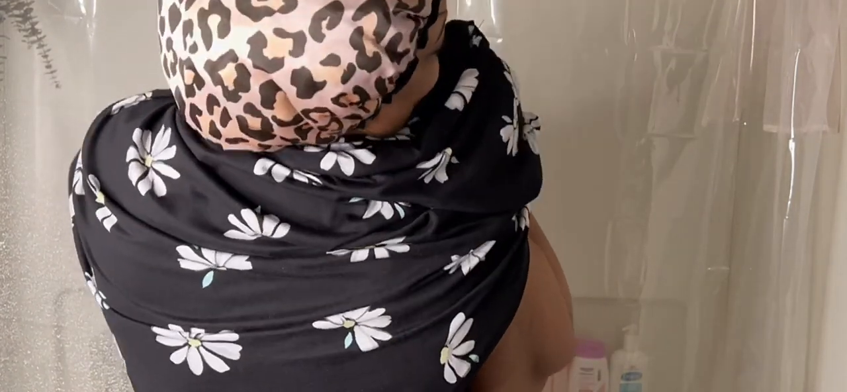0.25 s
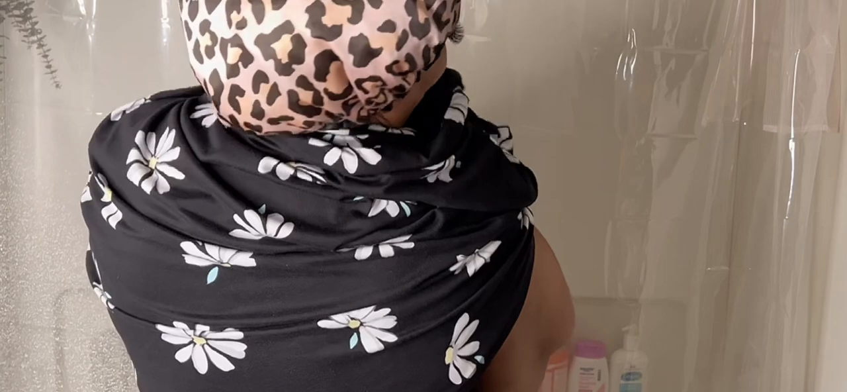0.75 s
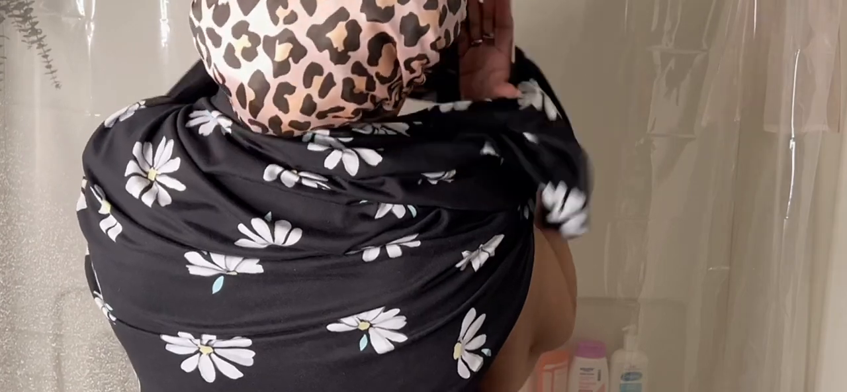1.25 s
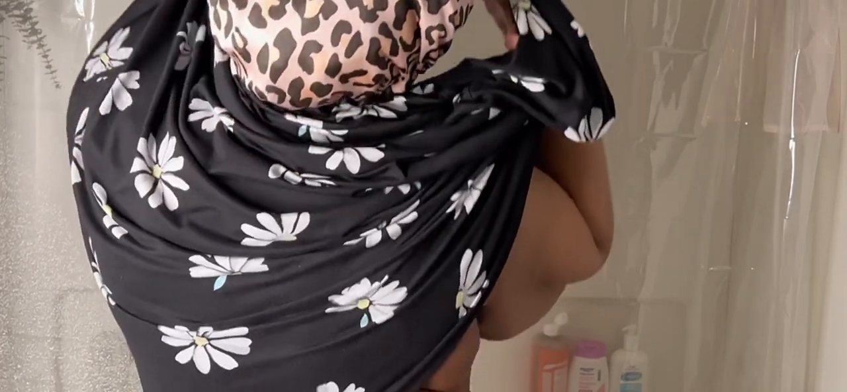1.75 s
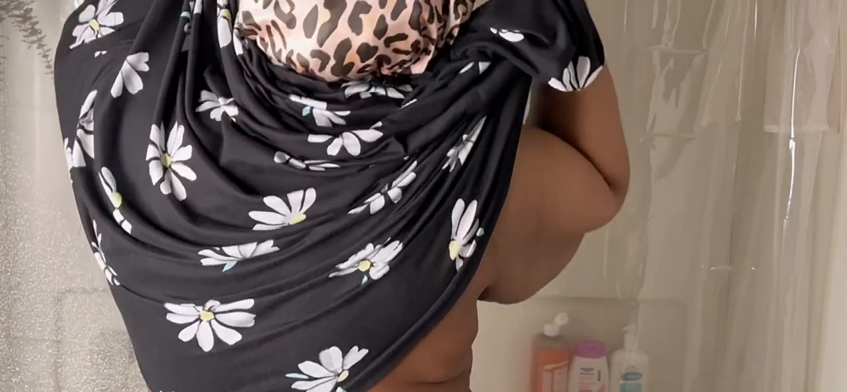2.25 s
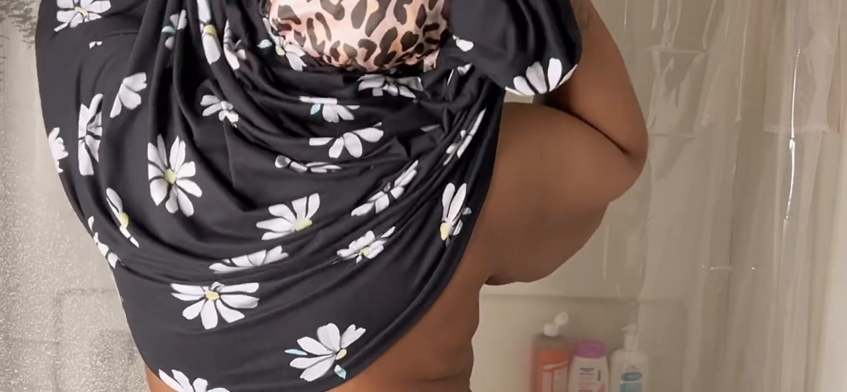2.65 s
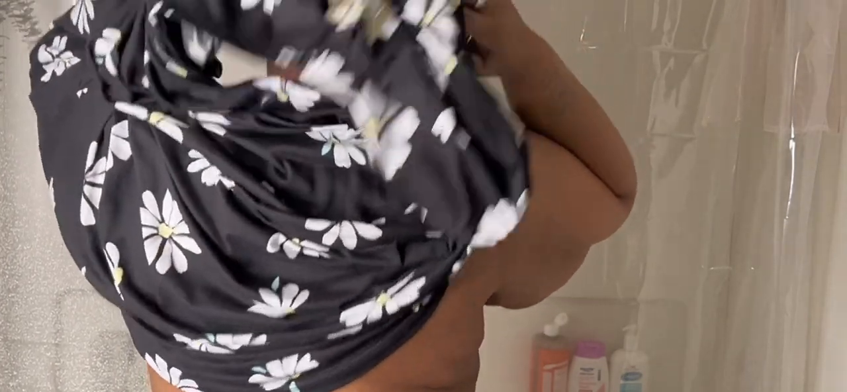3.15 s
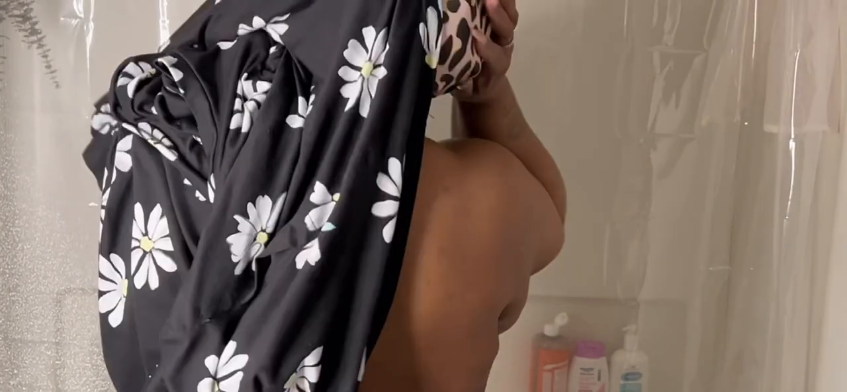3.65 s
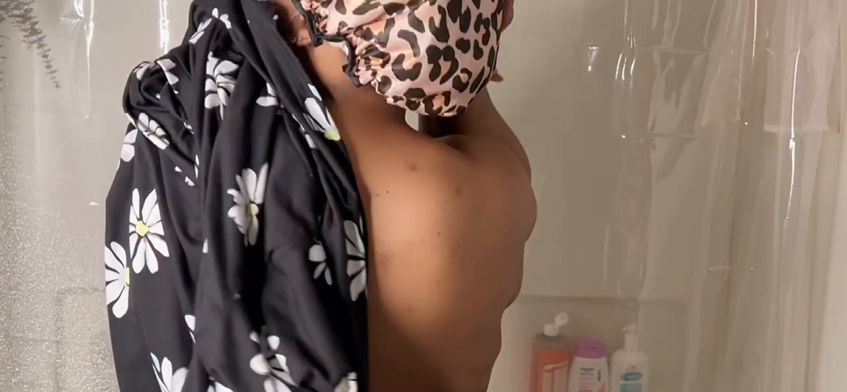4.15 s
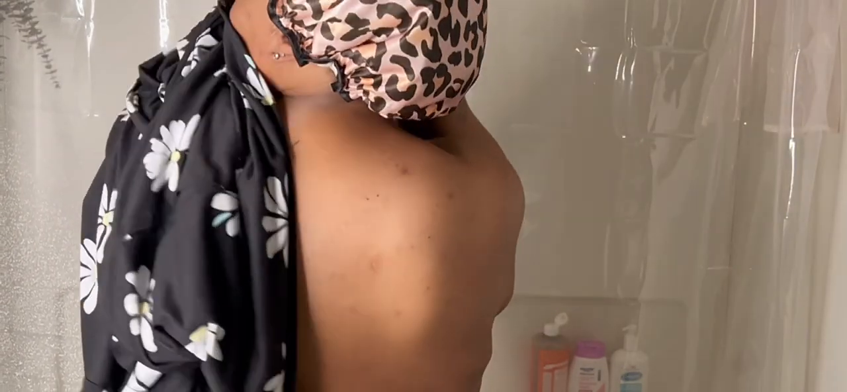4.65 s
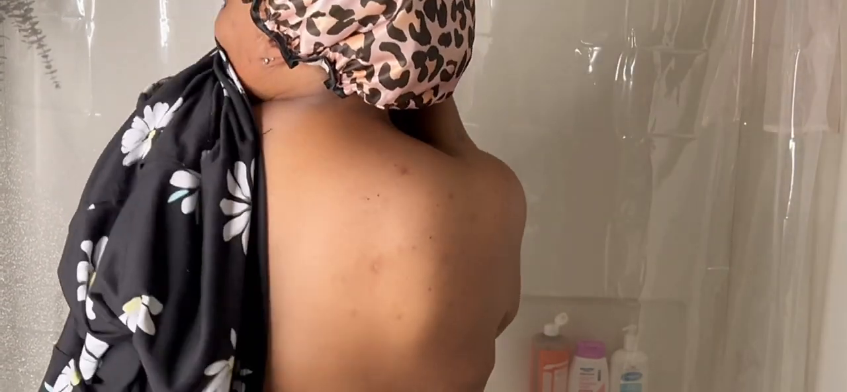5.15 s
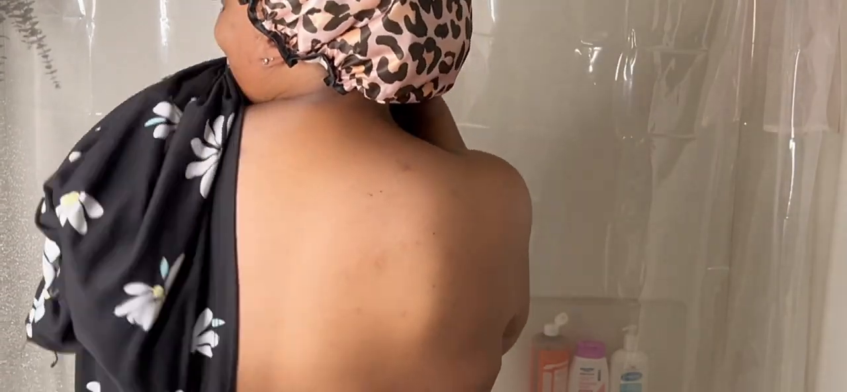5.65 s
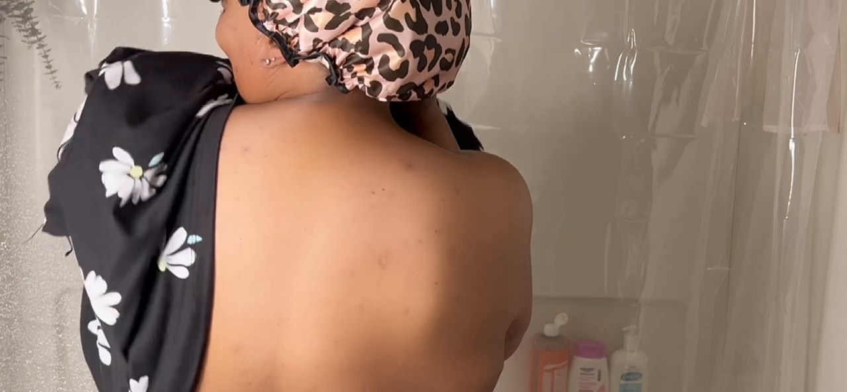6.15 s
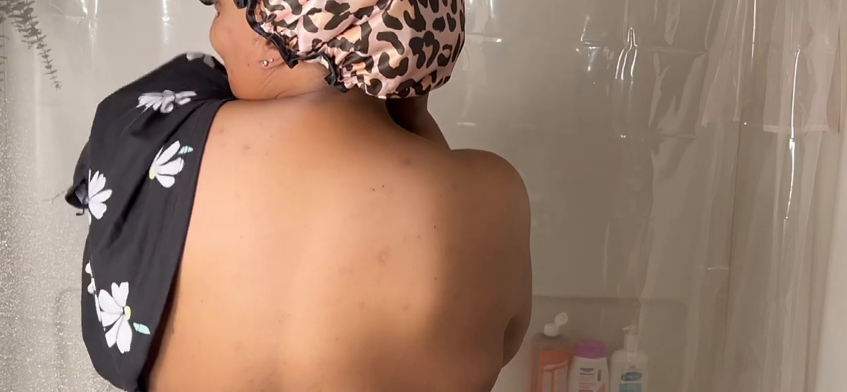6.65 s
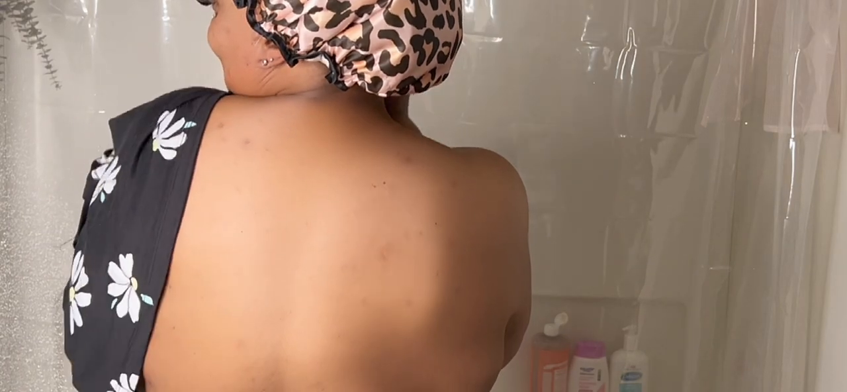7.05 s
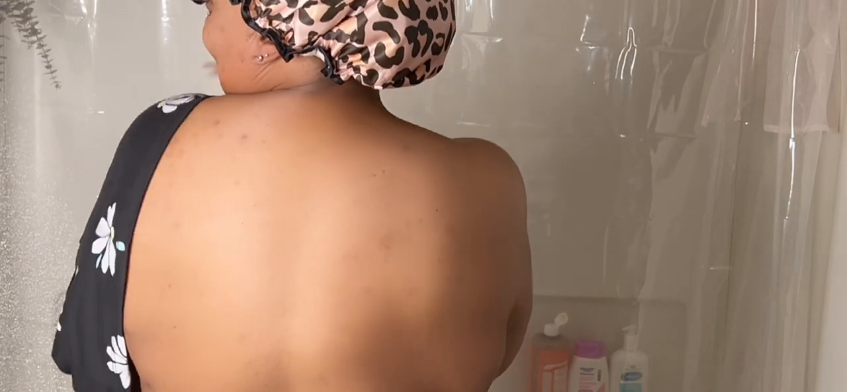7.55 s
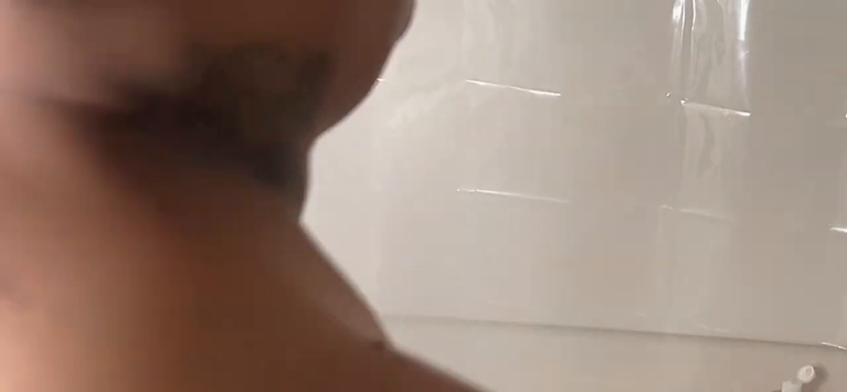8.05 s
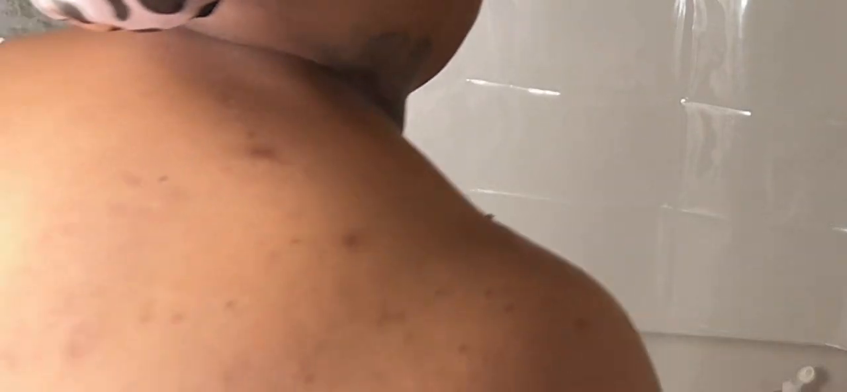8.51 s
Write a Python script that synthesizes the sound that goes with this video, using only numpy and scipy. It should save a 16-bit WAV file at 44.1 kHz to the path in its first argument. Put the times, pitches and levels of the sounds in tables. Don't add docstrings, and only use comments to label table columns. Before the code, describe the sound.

A shower sprays steadily into a tub in a small tiled bathroom, with crisp heavier splashes, then cuts off dead into silence.

```python
import sys
import numpy as np
from scipy import signal
from scipy.fft import rfft, irfft
from scipy.io import wavfile

SR = 44100
rng = np.random.default_rng(int(sys.argv[2]) if len(sys.argv) > 2 else 0)


def gain_from_db(level_db):
    decades = np.asarray(level_db, float) / 20
    return 10 ** decades


def transcribe(signal):
    frames = np.atleast_2d(signal).T
    limited = np.clip(frames, -1, 1)
    pcm = np.round(limited * 32767).astype(np.int16)
    wavfile.write(sys.argv[1], SR, pcm)


N = 387188
CUTOFF_HZ = 15790


def in_time(rows):
    time_s, *columns = np.transpose(rows)
    return [np.interp(np.arange(N) / SR, time_s, column) for column in columns]


def at_hz(rows, hz):
    table_hz, *columns = np.transpose(rows)
    return [np.interp(np.log(hz + 1), np.log(table_hz), column) for column in columns]


def drift(rate_per_s):
    r = np.exp(-80 * np.pi * rate_per_s / SR)
    noise = rng.standard_normal(N // 40 + 2002)
    slow = signal.lfilter([1], [1, -2 * r, r * r], noise)[2000:]
    return np.interp(np.arange(N) / 40, np.arange(len(slow)), slow / np.std(slow))


def surges(rows, rise_s, fall_s):
    start_s, lift_db = np.array(rows)[:, :1], np.array(rows)[:, 1]
    since_s = np.arange(N) / SR - start_s
    rise = np.clip(since_s / rise_s, 0, 1)
    ebb = np.exp(-np.maximum(since_s - rise_s, 0) / fall_s)
    return lift_db @ (rise * ebb)


DROPS_PER_S = 6000


def drops(size_db):
    landed = rng.random((2, N)) < DROPS_PER_S / SR
    size = np.minimum(rng.exponential(1, (2, N)), 3.5)
    hits = landed * gain_from_db(size_db * size) * rng.choice([-1, 1], (2, N))
    return .5 * hits / np.std(hits) + 0.86 * rng.standard_normal((2, N))


# time_s, level_db
FLOW = [(0.0, -39.5), (3.65, -39.5), (4.29, -38.5), (4.41, -41), (7.28, -39.5), (7.4, -39)]
# start_s, lift_db
FINE_SURGES = [(.04, 0), (.36, 0), (.78, 3), (1.8, 0.5), (2.75, 6.5), (3.38, 2), (3.99, 3), (4.27, -1.5),
               (6.42, 3.5), (7.29, 4), (7.75, 2.5)]
# start_s, lift_db
BOOMS = [
    (0, 2),
    (.7, 2),
    (2.2, 3),
    (3.35, 5),
    (4.8, 5.5),
    (6.5, 3),
]
# mode_hz, half_width_hz, depth_db, swells_per_s, boom_share [0-1]
TUB_SWELLS = [
    (75.2, 26, 1.1, 1.5, 1.),
    (232, 15, 1.5, 3.5, .1),
]
DRUM_FOLLOWS = 0.19


def spray(shared_db, own_db):
    hiss_db = in_time(FLOW)[0] + surges(FINE_SURGES, rise_s=.02, fall_s=0.037)
    boom_db = surges(BOOMS, rise_s=.12, fall_s=.25)
    hz = np.fft.rfftfreq(N, 1 / SR)
    white = rfft(drops(size_db=3.0))
    together = drift(3.3)
    out = 0
    centres = np.arange(9.5, 14.5, .5)
    octave = np.clip(np.log2(hz + 1), centres[0], centres[-1])
    for centre in centres:
        share = np.clip(1 - 2 * abs(octave - centre), 0, 1)
        treble = np.clip((centre - 10.5) / 2.67, 0, 1)
        follows = (1 - treble) * DRUM_FOLLOWS + treble
        flow_db = follows * (hiss_db - np.median(hiss_db))
        patch_db = (0.19 + treble) * (shared_db * together + own_db * drift(19.0))
        out = out + gain_from_db(flow_db + patch_db) * irfft(white * share, N)
    for mode_hz, half_width_hz, depth_db, swells_per_s, boom_share in TUB_SWELLS:
        mode = irfft(white * np.exp(-((hz - mode_hz) / half_width_hz) ** 2), N)
        swell_db = depth_db * drift(swells_per_s) + boom_share * (boom_db - boom_db.mean())
        out = out + (gain_from_db(swell_db) - 1) * mode
    return out


# start_s, pitch_hz, level_db
SPLASHES = [(.222, 6700, -37.5), (0.364, 5500, -33.5), (0.732, 2870, -39.5), (1.28, 5950, -38.5),
            (1.388, 2700, -40), (1.747, 4970, -31.5), (1.979, 7000, -38.5), (2.031, 3860, -40),
            (2.07, 8570, -34.5), (2.289, 10940, -34.5), (2.956, 5910, -40.5), (3.095, 2900, -37.5),
            (3.147, 5300, -34), (3.38, 5680, -34), (3.71, 8000, -35), (4.118, 4460, -34),
            (4.265, 8000, -31), (4.362, 3160, -35), (4.59, 5560, -40), (4.695, 5000, -41.5),
            (4.92, 7000, -36.5), (5.05, 5500, -38), (5.25, 6400, -43), (5.44, 11000, -32.5),
            (5.46, 6480, -36), (5.73, 6800, -36.5), (5.76, 11100, -34.5), (6.26, 7000, -35),
            (6.42, 8050, -38.5), (7.285, 6570, -34)]
SPLASH_T60_S, T60_PER_OCTAVE_S = 0.17, .035


def splashes(sharp):
    out, t = np.zeros((2, N)), np.arange(SR // 4) / SR
    for start_s, pitch_hz, level_db in SPLASHES:
        t60_s = SPLASH_T60_S + T60_PER_OCTAVE_S * np.log2(pitch_hz / 5000)
        r = np.exp(-np.pi * pitch_hz / sharp / SR)
        poles = [1, -2 * r * np.cos(2 * np.pi * pitch_hz / SR), r * r]
        burst = rng.standard_normal((2, len(t)))
        for _ in range(2):
            burst = signal.lfilter([1, 0, -1], poles, burst)
        shape = np.minimum(t / 0.0061, 1) * gain_from_db(-60 * t / t60_s)
        out[:, round(start_s * SR):][:, :len(t)] += gain_from_db(level_db + 34.5) * shape * burst / np.std(burst)
    return out


# freq_hz, density_db_per_hz
SPRAY_COLOUR = [(30, -35), (45, -6.5), (170, -16.5), (300, -3.5), (650, -7.5), (1000, -9.5), (2000, -10),
                (3300, -13), (4300, -12.5), (6500, -7.5), (8500, -12), (9800, -16), (12500, -16.5),
                (16000, -14.5)]
# peak_hz, width_hz, lift_db
RESONANCES = [(45.9, 6, 4.5), (71.4, 8.3, 11), (89, 23, 8), (143, 22, 12), (213.3, 16, 8.5),
              (236.4, 19.3, 13.5), (265, 20, -2.5), (369, 12, -5), (373.4, 33, 4.5), (389, 12, 0),
              (447, 27, 3.5), (476, 12, -9.5), (501, 14, 6), (537.8, 12.2, 8), (1137, 69, 6.5),
              (1344, 34, 7.5), (1260, 53, 5), (1520, 137, 3), (11000, 1000, 6.5)]
# freq_hz, left_minus_right_db, likeness [0-1]
PORTS = [(40, 4, 1), (76.8, -2.5, 1), (121, -5.5, 0.6), (197.6, -0.5, 1), (395, 1.5, 0.59),
         (680, -0.5, 0.05), (1315, 1, 0.09), (2260, 1.5, 0), (4200, 4.5, 0.03), (5500, 10.5, 0.4),
         (7000, 9.5, 0), (8300, 5, 0.1), (9300, 1, 0.9), (9900, -1, 1), (15800, 1, 0.9)]
LAG_S, IN_STEP_HZ = .000281, 12080
WANDER_RAD, WANDER_PER_S = .115, 10


def shower():
    hz = np.fft.rfftfreq(N, 1 / SR)
    near, other = rfft(spray(shared_db=1.28, own_db=0.6) + gain_from_db(-1) * splashes(sharp=2.5))
    colour_db, = at_hz(SPRAY_COLOUR, hz)
    for peak_hz, width_hz, lift_db in RESONANCES:
        colour_db += lift_db / (1 + (2 * (hz - peak_hz) / width_hz) ** 2)
    colour = gain_from_db(colour_db - 21) * (hz < CUTOFF_HZ)
    lean_db, alike = at_hz(PORTS, hz)
    alike = np.clip(alike, 0, 1)
    lag = np.exp(2j * np.pi * (hz - IN_STEP_HZ) * LAG_S * (hz > 3000))
    right = gain_from_db(-lean_db) * (alike * lag * near + np.sqrt(1 - alike ** 2) * other)
    quarter_turn = 1j * right * (hz > 8000)
    left, right, turned = irfft(colour * np.array([near, right, quarter_turn]), N)
    turn_rad = WANDER_RAD * drift(WANDER_PER_S)
    return np.array([left, right + np.tan(turn_rad) * turned])


BREAK_S, CUT_S = 7.8568, 7.891
BASS_STEP_DB, BASS_FALL_DB_PER_S = -23, -650
TREBLE_STEP_DB, TREBLE_FALL_DB_PER_S = -30.5, -2500


def break_off(water):
    t = np.arange(N) / SR
    bass_db = (t > BREAK_S) * (BASS_STEP_DB + BASS_FALL_DB_PER_S * (t - BREAK_S))
    treble_db = (t > BREAK_S) * (TREBLE_STEP_DB + TREBLE_FALL_DB_PER_S * (t - BREAK_S))
    hz = np.fft.rfftfreq(N, 1 / SR)
    bass = irfft(rfft(water) / (1 + (hz / 1500) ** 4), N)
    return (gain_from_db(bass_db) * bass + gain_from_db(treble_db) * (water - bass)) * (t < CUT_S)


# time_s, level_db
TRICKLE = [(8.643, -110), (8.645, -107.5), (8.659, -69.5), (8.72, -66), (8.78, -67)]
# freq_hz, density_db_per_hz
TRICKLE_COLOUR = [(65, -39.5), (110, -12), (180, 2), (400, 2), (700, -4), (1500, -5), (3000, -8),
                  (8000, -12), (15000, -26)]
# start_s, peak_db, pitch_hz
DRIPS = [
    (8.665, -60, 1200),
    (8.746, -55, 3000),
    (8.7466, -60, 5500),
]
RETURN_S = 8.644


def trickle(alike):
    hz = np.fft.rfftfreq(N, 1 / SR)
    colour_db, = at_hz(TRICKLE_COLOUR, hz)
    mid, side = irfft(gain_from_db(colour_db) * (hz < CUTOFF_HZ) * rfft(drops(size_db=4.5)), N)
    level_db, = in_time(TRICKLE)
    width = np.sqrt((1 - alike) / (1 + alike))
    out = gain_from_db(level_db) * (mid + width * side * [[1], [-1]]) / np.std(mid)
    t = np.arange(SR // 40) / SR
    for start_s, peak_db, pitch_hz in DRIPS:
        drip = gain_from_db(peak_db - 60 * t / 0.011) * np.sin(2 * np.pi * pitch_hz * t)
        out[:, round(start_s * SR):][:, :len(t)] += drip
    return out * (np.arange(N) / SR > RETURN_S)


def scene():
    return break_off(shower()) + trickle(alike=0.13)


def low_pass(x):
    return signal.sosfilt(signal.butter(12, 15800, fs=SR, output="sos"), x)


def record(dry):
    mix = .2 * np.tanh(dry / .2)
    return low_pass(mix)


dry = scene()
out = record(dry)
transcribe(out)
```